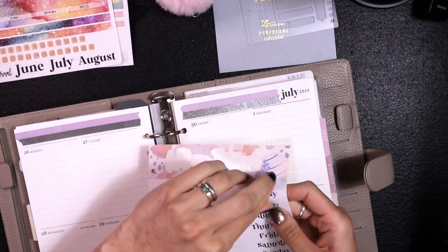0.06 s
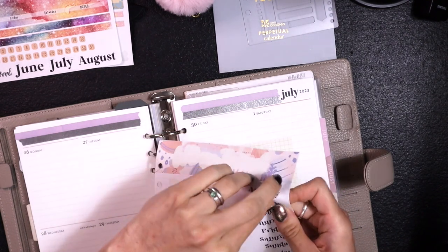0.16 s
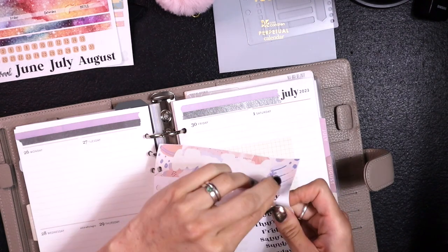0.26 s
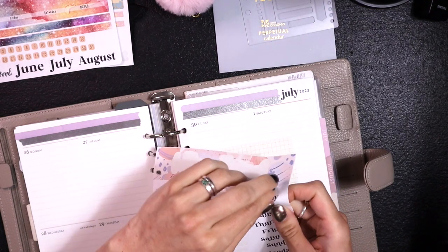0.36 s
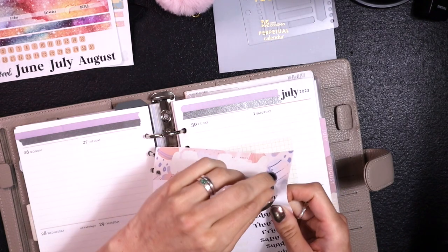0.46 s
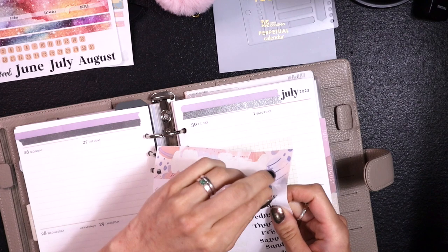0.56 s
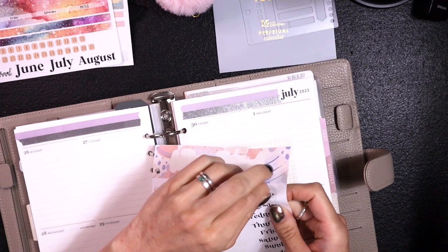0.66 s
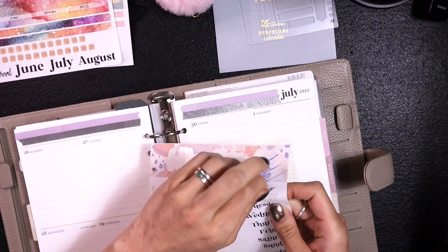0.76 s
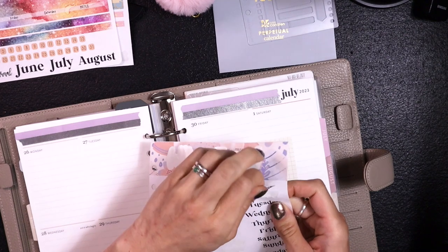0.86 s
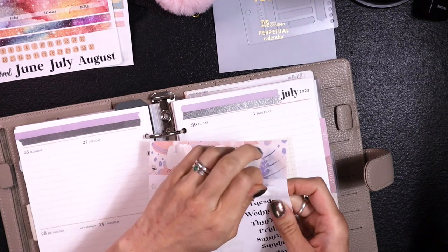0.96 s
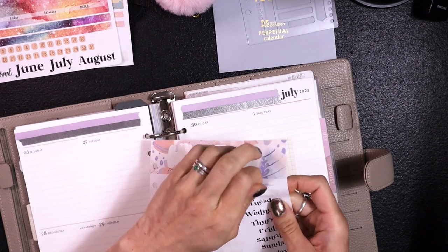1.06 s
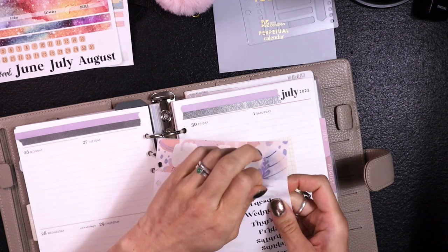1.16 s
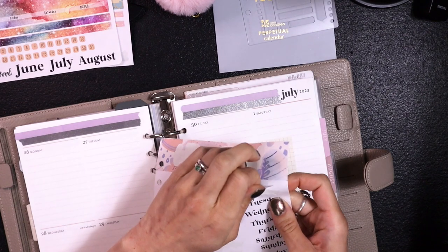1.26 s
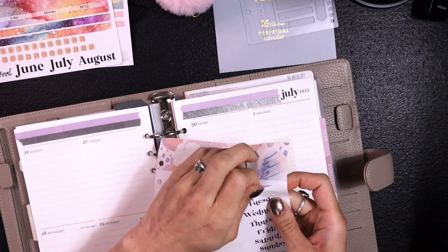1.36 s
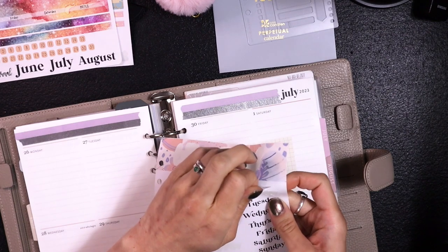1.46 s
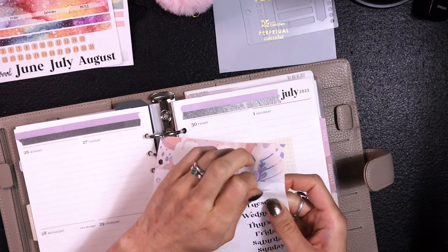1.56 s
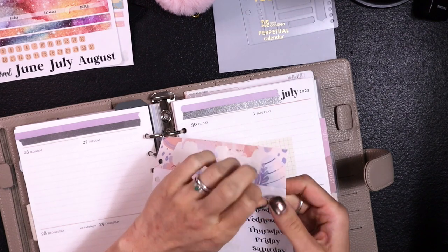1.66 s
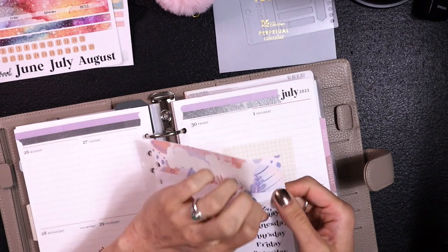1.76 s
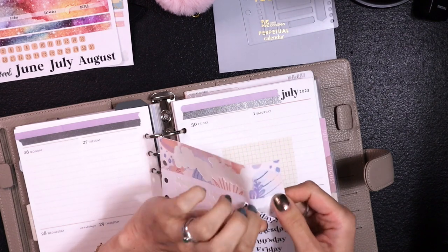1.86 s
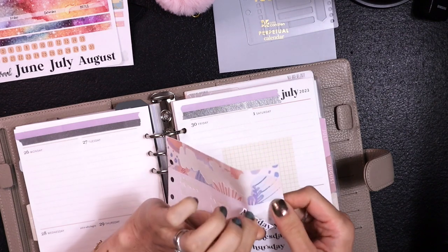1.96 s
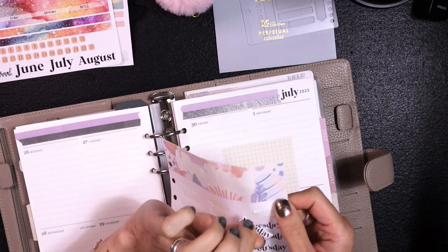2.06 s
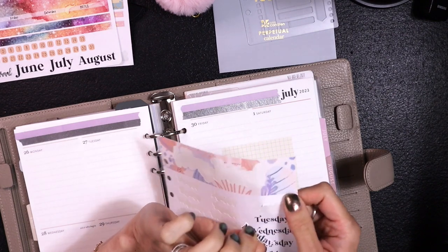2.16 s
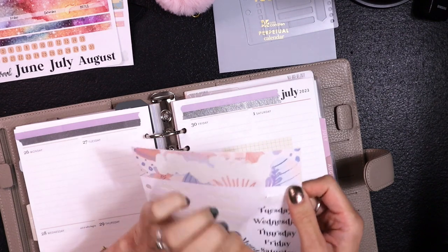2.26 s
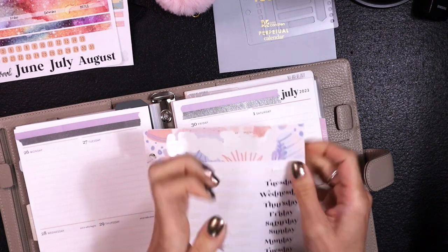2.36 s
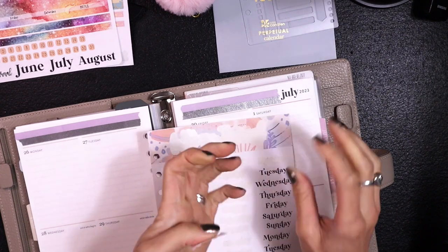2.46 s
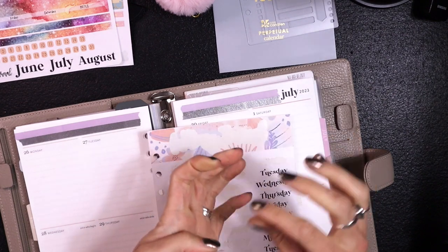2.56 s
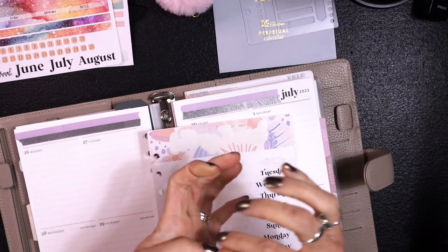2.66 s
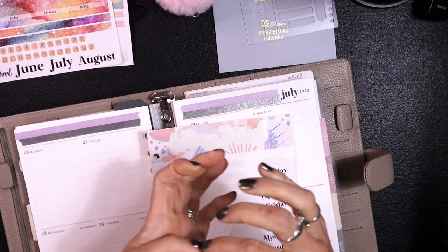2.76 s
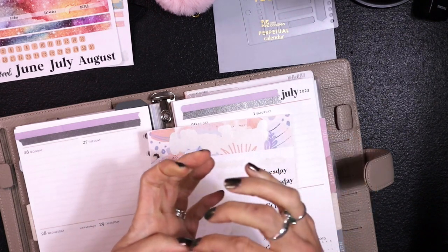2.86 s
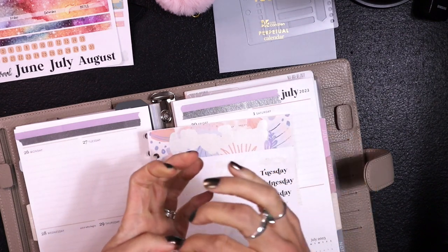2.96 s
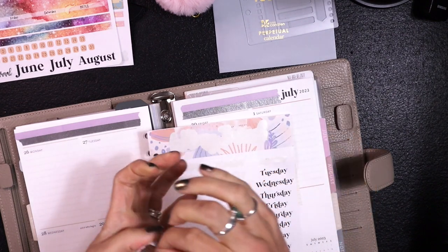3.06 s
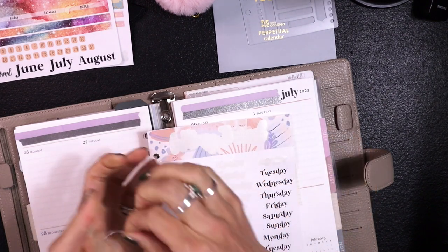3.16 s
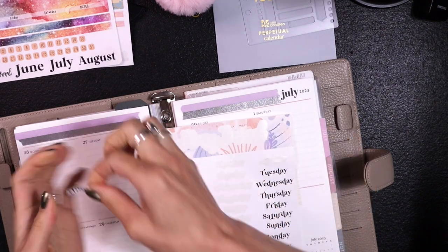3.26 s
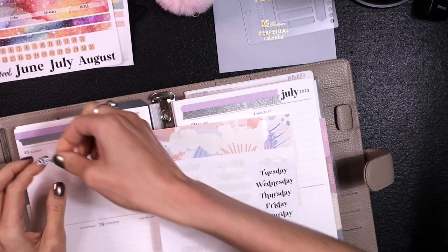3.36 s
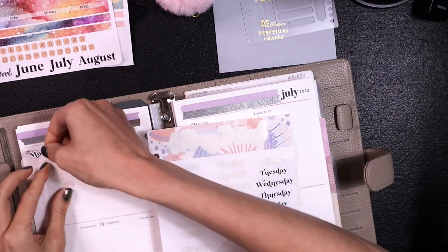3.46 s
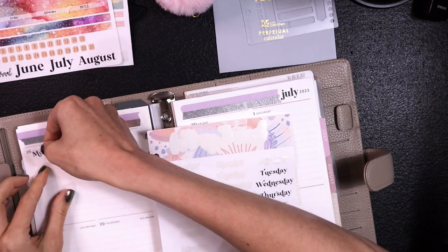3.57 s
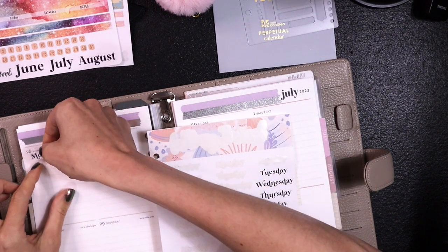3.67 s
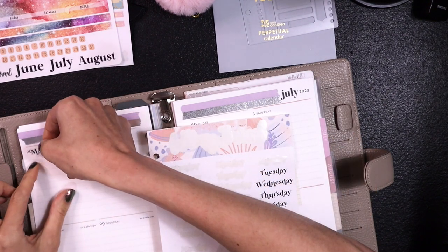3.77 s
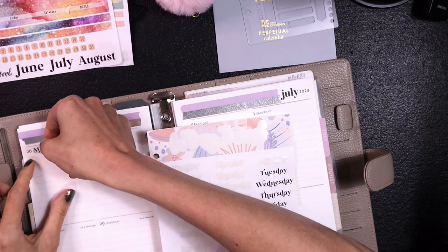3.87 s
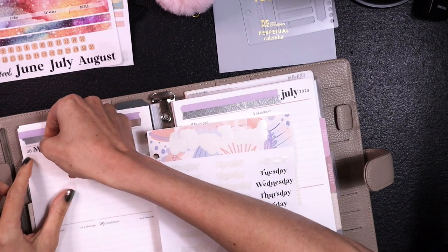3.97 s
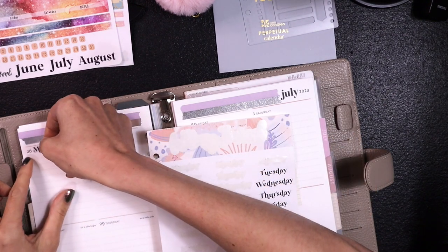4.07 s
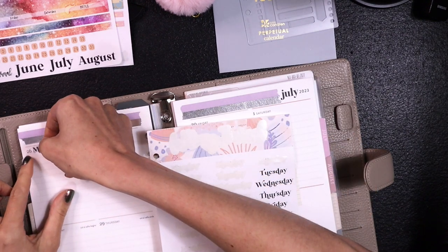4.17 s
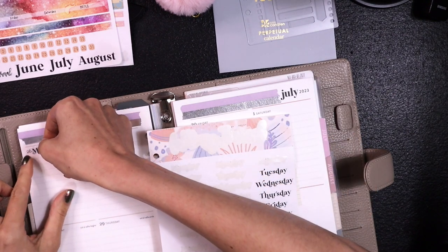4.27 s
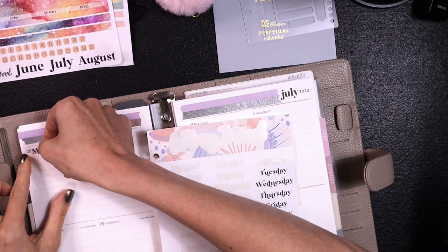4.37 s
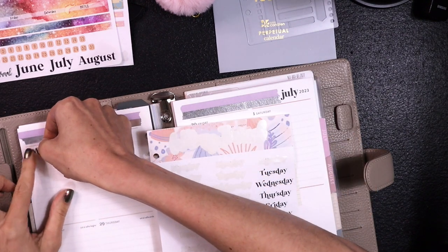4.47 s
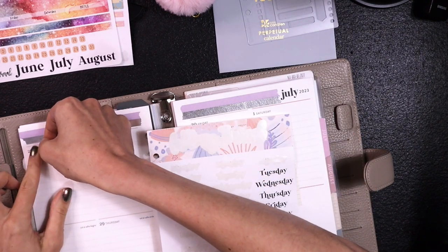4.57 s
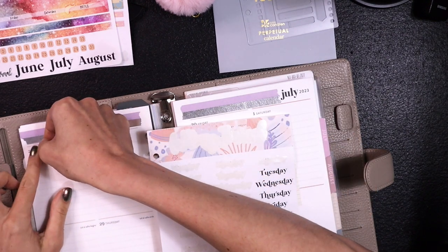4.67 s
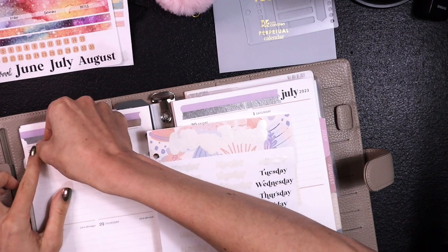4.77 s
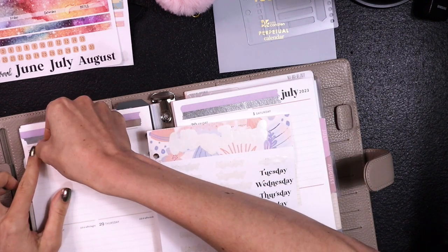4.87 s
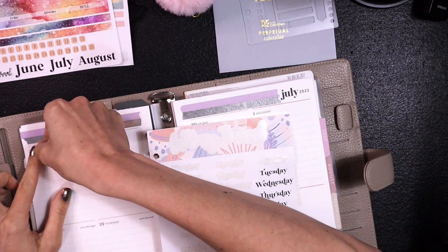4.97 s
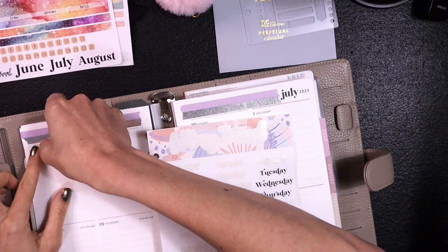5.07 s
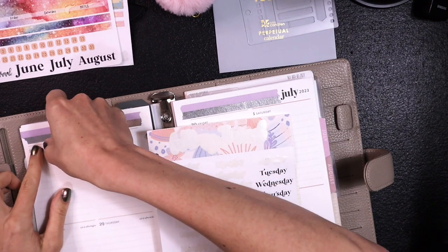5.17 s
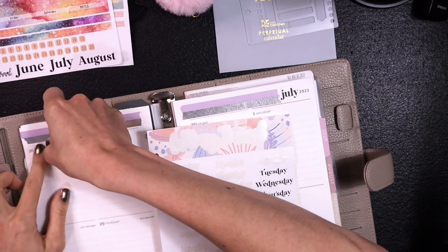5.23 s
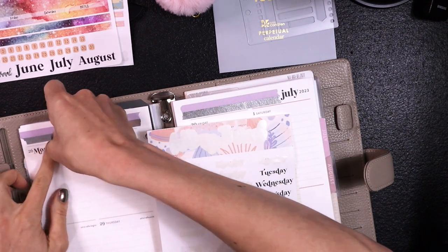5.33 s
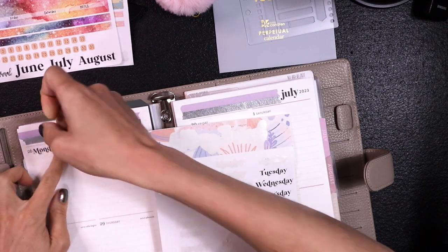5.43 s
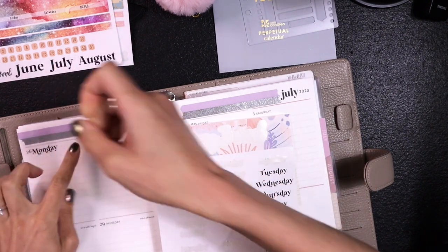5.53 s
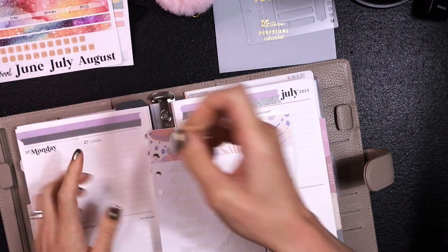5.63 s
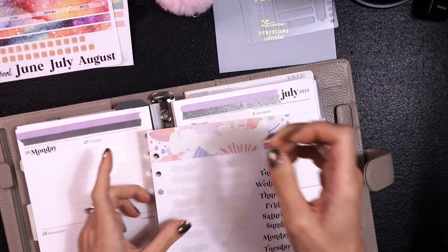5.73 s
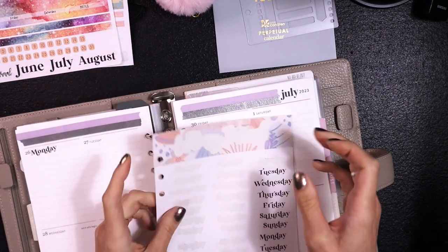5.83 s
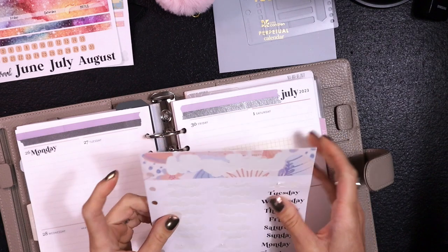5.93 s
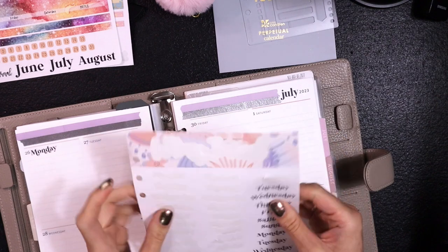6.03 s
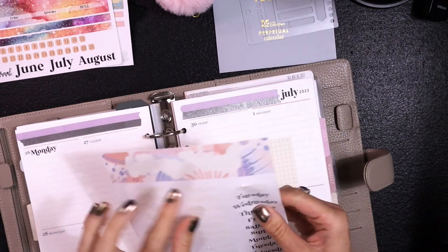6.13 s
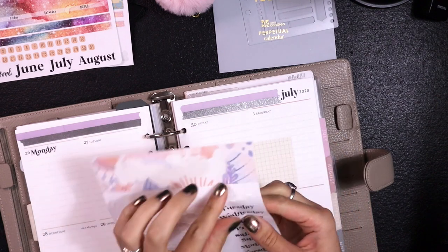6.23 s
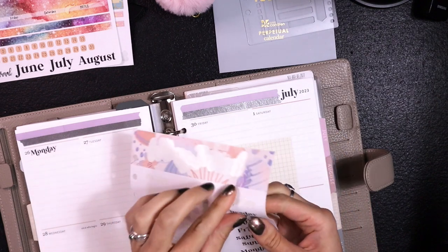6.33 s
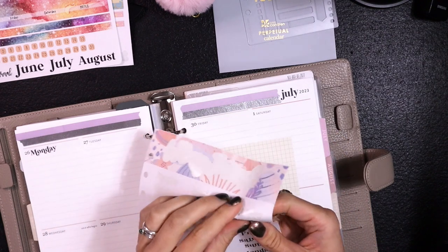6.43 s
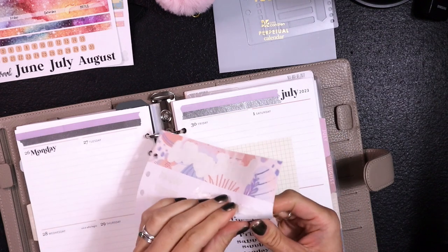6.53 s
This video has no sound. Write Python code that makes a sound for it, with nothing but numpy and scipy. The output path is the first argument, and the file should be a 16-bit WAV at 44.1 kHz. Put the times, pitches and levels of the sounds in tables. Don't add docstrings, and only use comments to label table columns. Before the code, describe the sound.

Crisp paper snaps and nail ticks, brief crinkly rustling, a quiet pause with one pop, then a busier burst of crackles and soft low thuds.

```python
import sys
import numpy as np
from scipy import signal
from scipy.fft import rfft, irfft
from scipy.io import wavfile
from scipy.ndimage import uniform_filter1d

SR = 44100
rng = np.random.default_rng(int(sys.argv[2]) if len(sys.argv) > 2 else 0)


def amplitude_ratio(level_db):
    exponent = np.asarray(level_db, float) / 20
    return 10 ** exponent


def to_wav(s):
    ch = np.atleast_2d(s).T
    pcm = np.round(np.clip(ch, -1, 1) * 32767)
    wavfile.write(sys.argv[1], SR, pcm.astype(np.int16))


N = 291060

# t/s, left minus right/dB
HANDS = [(0, .5), (.7, 2.5), (1.4, 1), (2.2, .5), (2.5, -2), (3.5, -2.5), (5.1, -5), (5.6, -3.5),
         (5.9, -1.5), (6.0, .3), (6.6, .8)]
# f/Hz, level per Hz/dB
AIR_MID = [(12, -38), (20, -2), (60, -2.5), (377, -8.5), (2910, -21), (9670, -39.5), (13200, -46),
           (16000, -90)]
# f/Hz, level per Hz/dB
AIR_SIDE = [(12, -58), (20, -22), (300, -2.5), (2500, -12.5), (8410, -27.5), (10200, -24), (11800, -35),
            (16000, -39)]
# t/s, pressure/dB, speed as brightness/dB
FINGERS = [(0, -71, 23), (.13, -51.5, -12), (.3, -44, -8.5), (0.429, -66.5, 5), (.63, -52, -7.5),
           (1.04, -57, -3.5), (1.5, -63, -7), (1.73, -41, -1.5), (1.95, -46.5, -1.5), (2.15, -54, 3.5),
           (2.55, -57, -1), (2.75, -63.5, 0), (3.7, -62.5, -2), (5.6, -68.5, 0), (5.9, -49, 2.5),
           (6.16, -51, 8), (6.3, -43, 0), (6.6, -42, 2)]
# middle t/s, length/ms, pressure/dB, brightness/dB
SCUFFS = [(.019, 103, -54.5, -1), (0.199, 101, -53.5, 10), (0.402, 124, -56.5, -10), (.85, 125, -64, -10),
          (1.305, 77, -63.5, 5), (1.362, 9.4, -51.5, 10), (1.535, 39, -66, -7), (1.628, 44, -46.5, 1.5),
          (1.662, 32, -52.5, 3), (1.724, 14, -57, -4), (1.8, 41, -51.5, 8.5), (1.872, 10.5, -50.5, 6),
          (2.104, 23, -44.5, 6), (2.28, 34, -58.5, 2), (2.335, 27, -65, 13), (2.397, 28, -59.5, 10),
          (2.516, 13.5, -38.5, -4.5), (2.736, 31, -54, 3), (2.83, 37, -66.5, 10), (3.149, 32, -53, 10),
          (3.188, 20, -53, 3), (5.312, 67, -62.5, 1), (5.43, 390, -67, 7), (5.593, 21, -52.5, -2),
          (5.863, 113, -60.5, 2), (5.98, 23, -51, 6), (6.008, 30, -62, 10), (6.098, 30, -43, 1),
          (6.301, 110, -54, 3), (6.498, 84, -54, -5)]
# middle t/s, length/ms, level/dB
BENDS = [
    (.3, 100, -71),
    (1.72, 23, -51.5),
    (1.834, 39, -38.5),
    (2.102, 22, -43),
    (2.52, 80, -51),
    (5.92, 270, -49),
    (6.006, 29, -31),
    (6.121, 23.5, -30),
    (6.31, 100, -50),
]
# level re pressure/dB, share of brightness/1
FRICTION = [
    (-8.5, -0.46),
    (1.1, -0.83),
    (0.6, 0.073),
    (-1.24, 0.81),
]
# f/Hz, width/Hz, level/dB
SHEET = [(432, 45, 0), (1130, 240, -16), (1620, 880, -2.5), (2905, 710, -4)]
# f/Hz, width/Hz, level/dB
BRUSH = [(4600, 420, 8), (6590, 820, 5.5), (10060, 1730, 2.5)]
# t/s, knock peak level/dB, knock f/Hz, sheet boom re knock/dB
SNAPS = [(0.174, -22, 1690, -12), (0.179, -27.5, 1300, -9), (0.338, -37, 1500, -17),
         (0.626, -19.5, 1340, -38), (0.766, -33.5, 1290, -27), (0.958, -33, 1410, -11),
         (1.324, -19.5, 810, -26), (1.567, -31, 780, -23), (1.82, -25.5, 1600, -3),
         (1.836, -34.5, 765, -10), (2.105, -19, 2080, -10), (2.109, -13, 1180, -5),
         (2.113, -17.5, 745, -10), (2.46, -19, 1970, -15), (2.516, -25.5, 970, -1.5),
         (5.0715, -24, 866, -14.5), (5.828, -34, 1170, -9), (5.882, -26, 1160, -6.5),
         (5.918, -30, 1770, -20), (5.926, -19.5, 1110, -15), (5.977, -28, 1080, -15),
         (5.988, -17.5, 1100, -9), (5.992, -26, 1250, -15), (6.042, -19, 946, -7.5),
         (6.084, -30.5, 1430, 3), (6.109, -10, 1640, -11), (6.275, -44, 776, 13), (6.288, -45.5, 765, 11),
         (6.298, -32, 1470, -12), (6.575, -37, 1150, -10)]
# t/s, ring peak level/dB, ring f/Hz, crackle re ring/dB
TICKS = [(0.173, -35, 2200, -5), (0.6272, -9.5, 2980, -16.5), (0.7669, -25, 3250, -11),
         (0.8041, -30.5, 2920, -8), (1.311, -37.5, 2900, -7), (1.3227, -48, 2960, -21),
         (1.5678, -24.5, 2940, -8.5), (1.8718, -33, 2470, -4), (2.098, -31, 3600, -13),
         (2.1047, -20.5, 3500, -2.5), (2.1094, -13, 2460, -30), (2.114, -14.5, 2260, -31),
         (2.4605, -23.5, 2480, -15), (2.5167, -13.5, 2670, -12), (3.184, -35, 2720, -10),
         (3.5092, -38.5, 4120, -8), (5.0729, -26.5, 1710, 0), (5.881, -39, 2330, -23),
         (5.918, -34, 2770, -12), (5.9873, -21, 3640, -7), (6.0406, -46, 2280, -18),
         (6.1071, -23, 2950, -8), (6.1095, -9, 2800, -39), (6.2751, -29.5, 2300, -14),
         (6.298, -31, 2600, -16)]
# t/s, crackle peak level/dB, fizz re crackle/dB
GLUE = [(0.181, -50, 4), (0.224, -41, -3), (0.4754, -44.5, -2), (0.9586, -34, -9), (1.762, -23.5, 2.5),
        (1.801, -34, 7), (2.0672, -42, -1.5), (2.0854, -42, -1.5), (2.094, -33, -5), (2.511, -36, -7),
        (2.7262, -44, 3), (2.7335, -48, 4), (2.744, -53, -1.5), (2.844, -47, -5), (3.11, -60, 6),
        (3.118, -64, 8), (3.126, -59, 4), (3.132, -48, 0), (3.141, -30, 5.5), (3.179, -37, 7),
        (3.183, -44, 17), (5.046, -49, -3), (5.0723, -17.5, -11), (5.0742, -33, 17), (5.828, -36, 2),
        (6.099, -40, -4), (6.105, -31, 2), (6.1444, -43, -8)]
# f/Hz, width/Hz, level/dB
GLOSS = [(4850, 5000, 11), (7000, 7700, 10), (10650, 1140, 33)]
# t/s, peak level/dB, f/Hz, t60/s
THUDS = [
    (1.818, -44, 175, 0.089),
    (2.107, -47, 188, 0.083),
    (2.516, -48, 110, 0.097),
    (5.074, -31, 121, 0.049),
    (5.985, -33, 176, 0.048),
    (6.108, -34, 126, 0.06),
    (6.273, -39.5, 165, 0.048),
]
# f/Hz, t60/s, level/dB
ROOM = [(250, 0.16, -9.5), (974, 0.14, -4), (3050, 0.15, -1.5), (8430, 0.16, -2)]

AIR_MID_DB, AIR_SIDE_DB = -52, -48.5
PATCHY_DB = 3.5
SNAP_MS, SNAP_MS_PER_OCTAVE, SNAP_MID_HZ = 1.9, -.3, 1100
TICK_MS = 1.7
GLUE_HZ, GLUE_RING_DB, GLUE_MS = 3060, -6, .65
FIZZ_DB, FIZZ_SLOPE = 7, 1.66
WIDE_BOOM, WIDE_KNOCK, WIDE_RING, WIDE_CRACKLE, WIDE_FIZZ = 0.06, 0.067, 0.42, 0.93, 0.99
ROOM_WIDE = 1.35
PORT_TOP_HZ, CUT_HZ = 12470, 16200


def band(x, hz, width):
    return signal.lfilter(*signal.iirpeak(min(hz, .45 * SR), hz / width, fs=SR), x)


def between(x, lo_hz, hi_hz):
    return signal.sosfilt(signal.butter(2, [lo_hz, hi_hz], "bandpass", fs=SR, output="sos"), x)


def modes(x, table):
    return sum((-1) ** k * amplitude_ratio(db) * band(x, hz, width) for k, (hz, width, db) in enumerate(table))


def decay(t, t60):
    return np.exp(-np.log(1000) * t / t60)


def even(x, bins):
    spectrum = rfft(x)
    smooth = uniform_filter1d(np.abs(spectrum), bins)
    return irfft(spectrum / (smooth + 1e-12), x.shape[-1])


def walk(rate):
    k = int(SR / rate)
    held = np.repeat(rng.standard_normal(N // k + 1), k)
    return 0.81 * uniform_filter1d(uniform_filter1d(held, k), k)[:N]


def grains(size, share, scatter_db):
    fire, sign, force = rng.random((3, 2, size))
    return (fire < share) * np.sign(sign - .5) * amplitude_ratio(-scatter_db * np.log(1 - force))


def pair(x, wide):
    return np.array([x[0] + wide * x[1], x[0] - wide * x[1]])


def add(out, x, s):
    i = int(s * SR)
    out[:, i:i + x.shape[1]] += x[:, :N - i]


def air(table, db):
    hz = np.fft.rfftfreq(N, 1 / SR)
    table_hz, table_db = np.transpose(table)
    colour = np.interp(np.log(hz + 1), np.log(table_hz), table_db)
    x = irfft(rfft(rng.standard_normal(N)) * amplitude_ratio(colour), N)
    return x / x.std() * amplitude_ratio(db + 1.6 * walk(3.07))


def swell(t, s, ms):
    return np.exp(-np.minimum((2000 * (t - s) / ms) ** 2 * 1.34, 30))


def grip():
    t = np.arange(N) / SR
    s, press_db, bright_db = np.transpose(FINGERS)
    layer_db, share = np.transpose(FRICTION)[:, :, None]
    push = amplitude_ratio(np.interp(t, s, press_db) - 10.0 + layer_db + share * np.interp(t, s, bright_db))
    for s, ms, db, bright_db in SCUFFS:
        start, end = max(int((s - ms / 500) * SR), 0), int((s + ms / 500) * SR)
        push[:, start:end] += amplitude_ratio(db + layer_db + share * bright_db) * swell(t[start:end], s, ms)
    for s, ms, db in BENDS:
        push[0] += amplitude_ratio(db) * swell(t, s, ms)
    return push


def rustle():
    slips = grains(N, .08, 1.84) * amplitude_ratio(2.6 * walk(120) + 2.0 * walk(400))
    flex = band(slips, SHEET[0][0], SHEET[0][1]) + 0.6 * between(slips, 310, 900)
    rub = between(modes(slips, SHEET[1:3]) + 0.38 * slips, 734, 2130)
    squeak = between(modes(slips, SHEET[3:]) + 0.41 * slips, 1800, 6460)
    skin = np.roll(slips, 64, axis=1)
    hiss = between(modes(skin, BRUSH) + 0.23 * skin, 6200, 12800)
    out = np.zeros((2, N))
    layers = ((flex, .3), (rub, .45), (squeak, .6), (hiss, 1.2))
    for (x, wide), push in zip(layers, grip()):
        out += pair(x / x[0].std(), wide) * push * amplitude_ratio(PATCHY_DB * walk(45))
    return out


def volley(ms):
    t, last = np.arange(2048) / SR, 0.0013 * max(ms, .2)
    shape = np.exp(-t / last) * (1 - np.exp(-t / (0.079 * last)))
    slips = grains(len(t), .25, 3.6) * shape
    slips[0, int(.3 * last * SR)] += 4.5
    return even(slips, bins=5) * (t < .03)


def strike(x, db, wide):
    both = pair(x, wide)
    both = both / both.std(axis=1)[:, None]
    return both * amplitude_ratio(db) / np.abs(both.mean(axis=0)).max()


def ticks_and_pops():
    hits = []
    for s, db, hz, bright_db in TICKS:
        hits.append((s, db, hz, db + bright_db, db + FIZZ_DB + FIZZ_SLOPE * bright_db, TICK_MS))
    for s, db, fine_db in GLUE:
        hits.append((s, db + GLUE_RING_DB, GLUE_HZ, db, db + fine_db, GLUE_MS))
    out = np.zeros((2, N))
    for s, ring_db, hz, crackle_db, fizz_db, ms in hits:
        slips = volley(ms)
        ring = band(band(slips, hz, 0.11 * hz), hz, 0.5 * hz) + 0.22 * between(slips, 1600, 4800)
        crackle = between(modes(slips, GLOSS[:2]) + .5 * slips, 3800, 11400)
        fizz = modes(slips, GLOSS[2:]) + 2.3 * between(slips, 8800, 16700)
        add(out, strike(ring, ring_db, WIDE_RING), s)
        add(out, strike(crackle, crackle_db + 6.5, WIDE_CRACKLE), s)
        add(out, strike(fizz, fizz_db + 4, WIDE_FIZZ), s)
    return out


def buckles():
    out = np.zeros((2, N))
    for s, db, hz, boom_db in SNAPS:
        slips = volley(SNAP_MS + SNAP_MS_PER_OCTAVE * np.log2(hz / SNAP_MID_HZ))
        knock = band(band(slips, hz, 0.57 * hz), hz, 1.16 * hz) + 0.043 * between(slips, 580, 1900)
        boom = between(band(slips, SHEET[0][0], SHEET[0][1]) + 0.78 * slips, 294, 940)
        add(out, strike(knock, db, WIDE_KNOCK), s)
        add(out, strike(boom, db + boom_db + 4, WIDE_BOOM), s)
    return out


def thuds():
    out, t = np.zeros((2, N)), np.arange(8192) / SR
    for s, db, hz, t60 in THUDS:
        bounce = np.sin(2 * np.pi * hz * t) * decay(t, t60) * (1 - np.exp(-t / 0.002))
        add(out, np.array([bounce, bounce]) * amplitude_ratio(db + 4.5), s)
    return out


def room(x):
    t = np.arange(16384) / SR
    noise = rng.standard_normal((2, len(t))) * np.exp(-t / 0.044) * np.clip((t - .004) / 0.0021, 0, 1)
    noise = even(noise, bins=15) * np.exp(np.minimum(t, .2) / 0.034) * (t < .2)
    noise = noise / noise[:, :4096].std()
    noise[1] = between(noise[1], 900, 18000)
    tail = np.zeros_like(noise)
    for hz, t60, db in ROOM:
        tail += amplitude_ratio(db) * between(noise, hz / 2.39, hz * 2.06) * decay(t, t60) / np.sqrt(t60 * hz)
    return signal.fftconvolve(x.mean(axis=0)[None], pair(tail, ROOM_WIDE), axes=1)[:, :N]


def scene():
    pan_db = np.interp(np.arange(N) / SR, *np.transpose(HANDS))
    near = rustle() + ticks_and_pops() + buckles() + thuds()
    heard = (near + room(near)) * amplitude_ratio(np.array([pan_db, -pan_db]) / 2)
    heard = signal.sosfilt(signal.butter(3, PORT_TOP_HZ, fs=SR, output="sos"), heard)
    mid, side = air(AIR_MID, AIR_MID_DB), air(AIR_SIDE, AIR_SIDE_DB)
    return heard + np.array([mid + side, mid - side])


def roll_off(x):
    return signal.sosfilt(signal.butter(12, 16800, fs=SR, output="sos"), x)


def record(dry):
    cut = signal.ellip(8, .1, 70, CUT_HZ, fs=SR, output="sos")
    return roll_off(signal.sosfilt(cut, dry))


dry = scene()
out = record(dry)
to_wav(out)
```